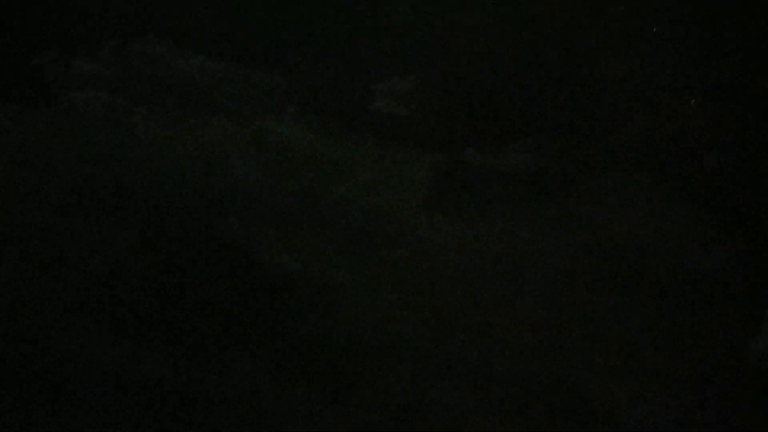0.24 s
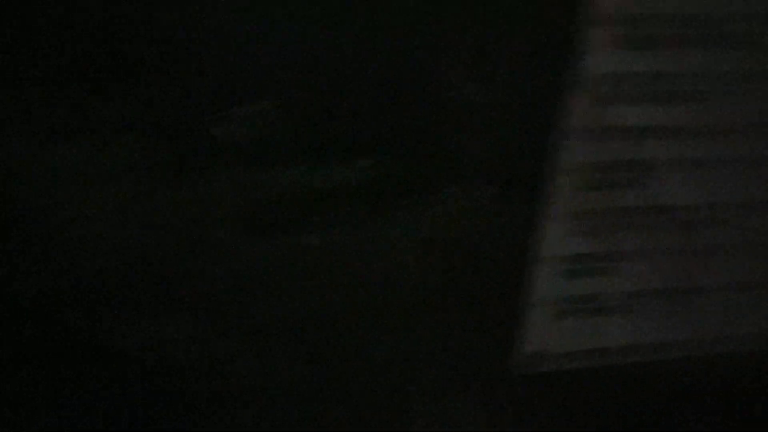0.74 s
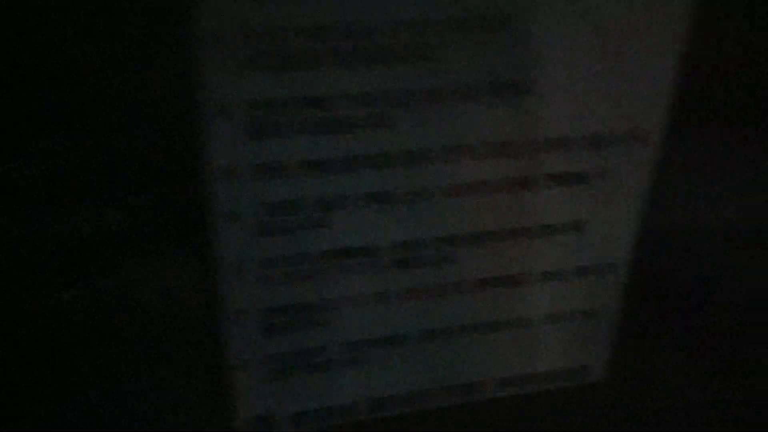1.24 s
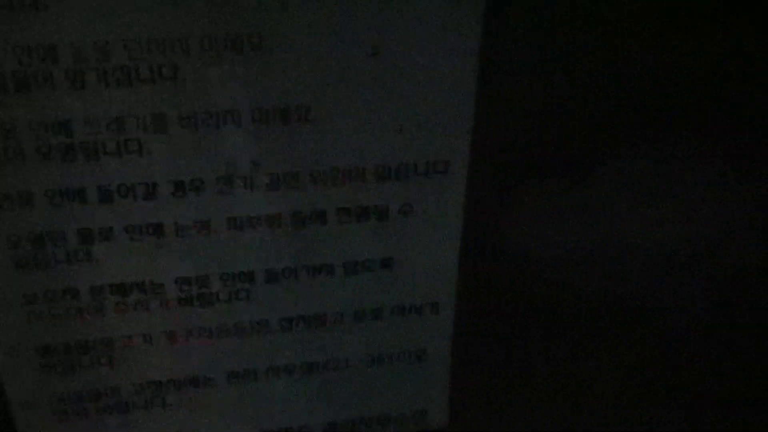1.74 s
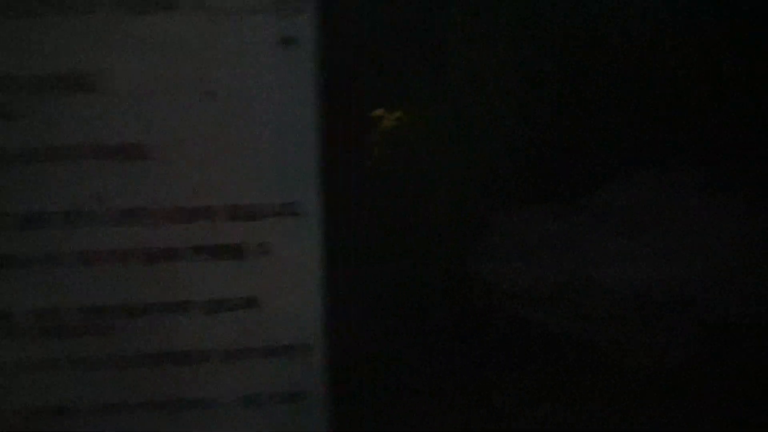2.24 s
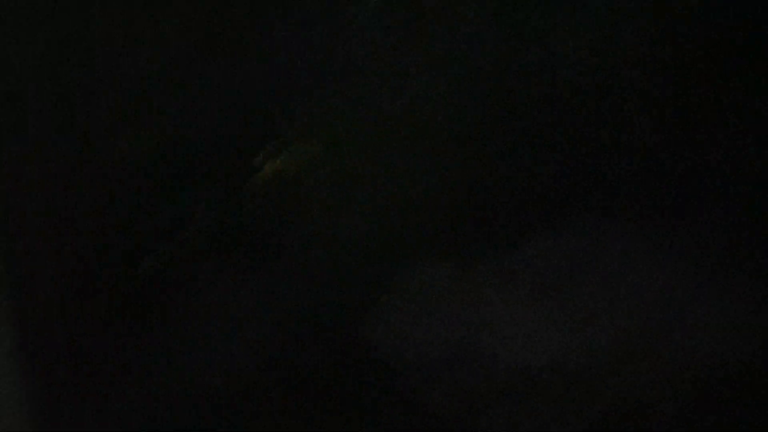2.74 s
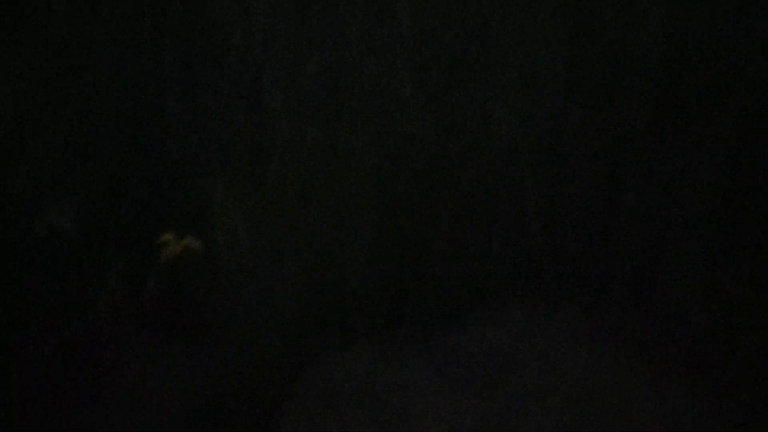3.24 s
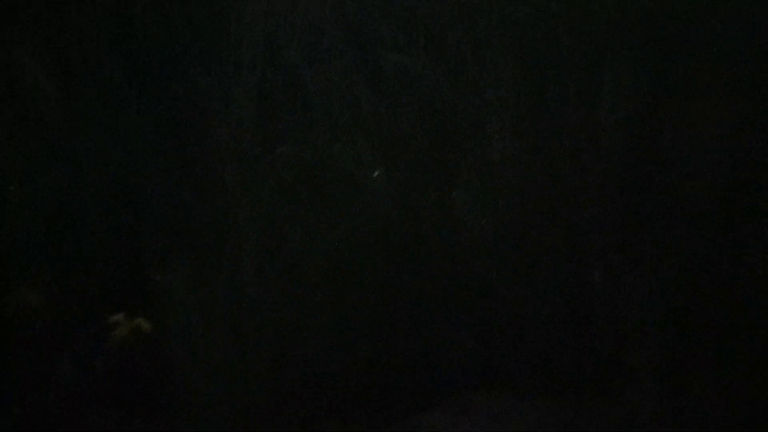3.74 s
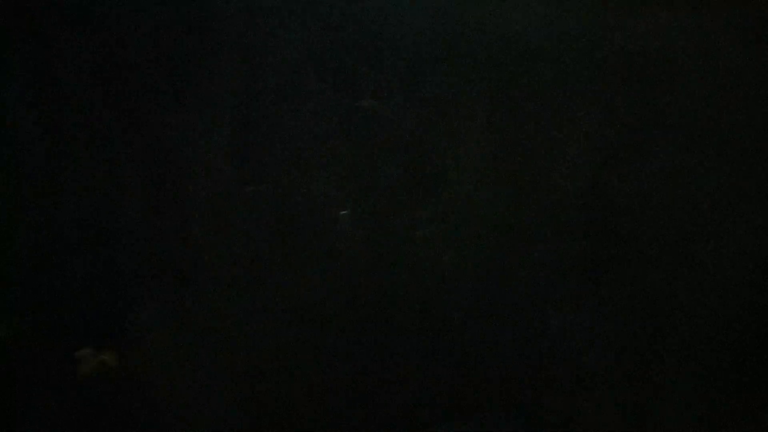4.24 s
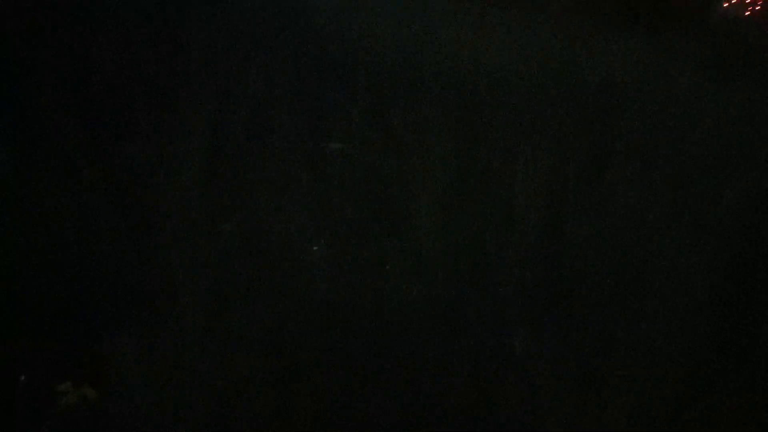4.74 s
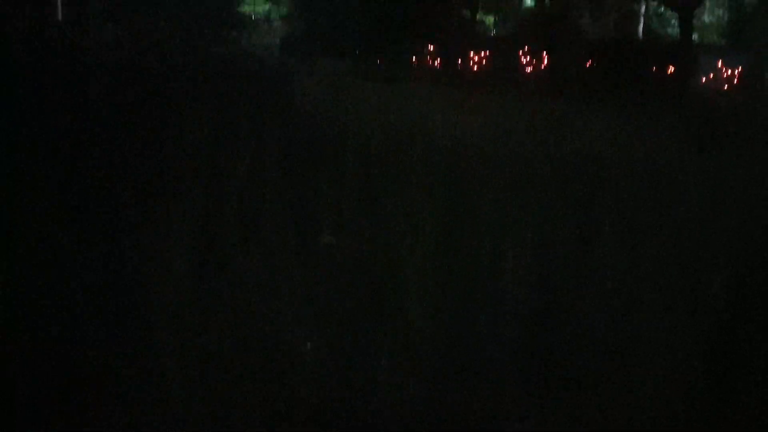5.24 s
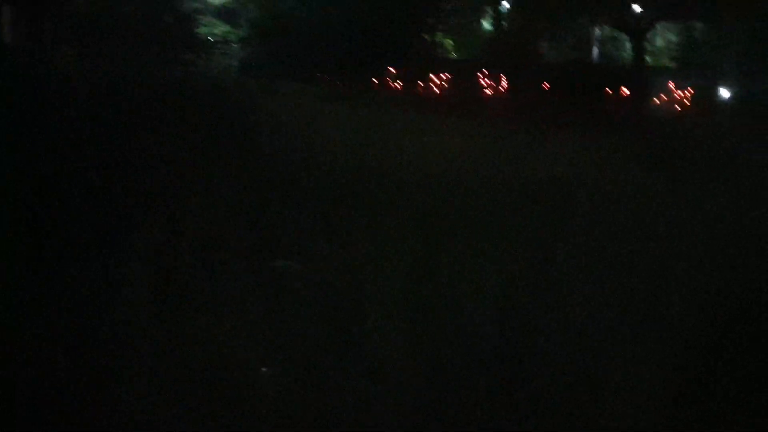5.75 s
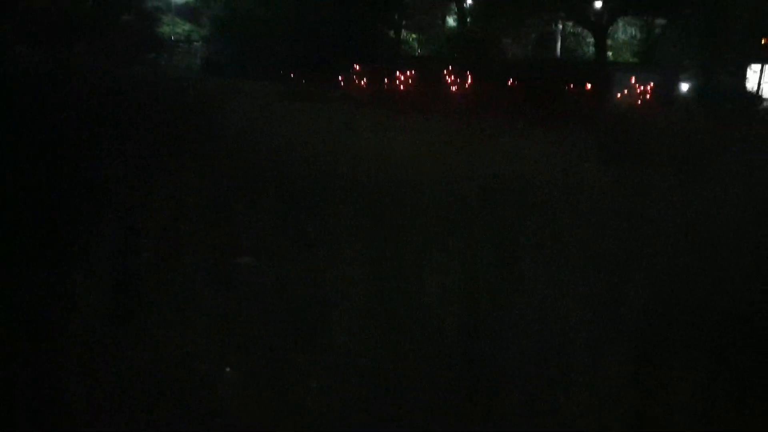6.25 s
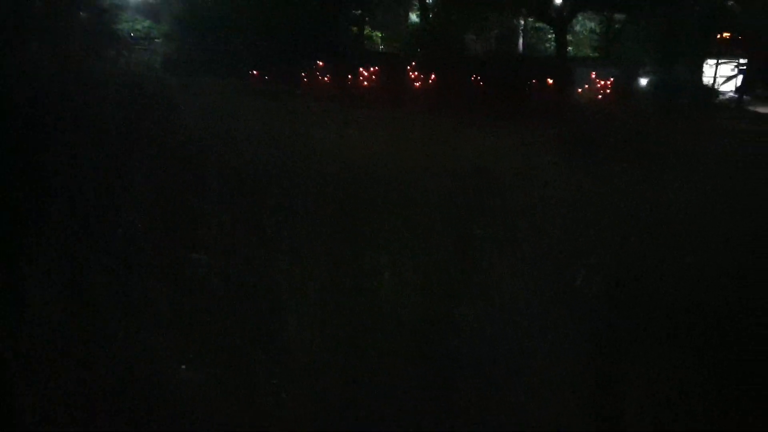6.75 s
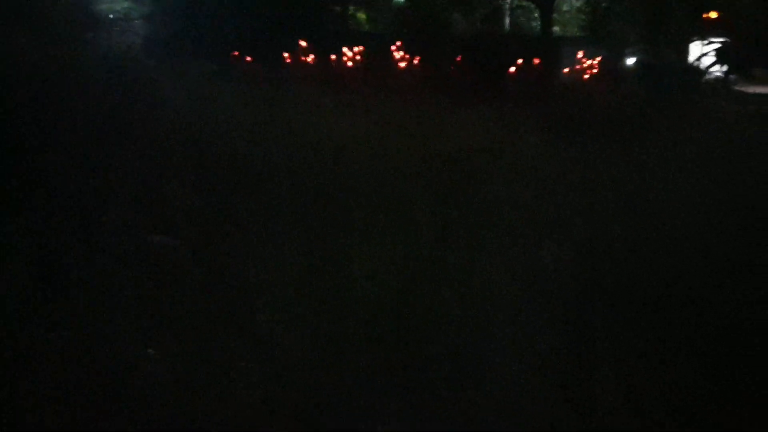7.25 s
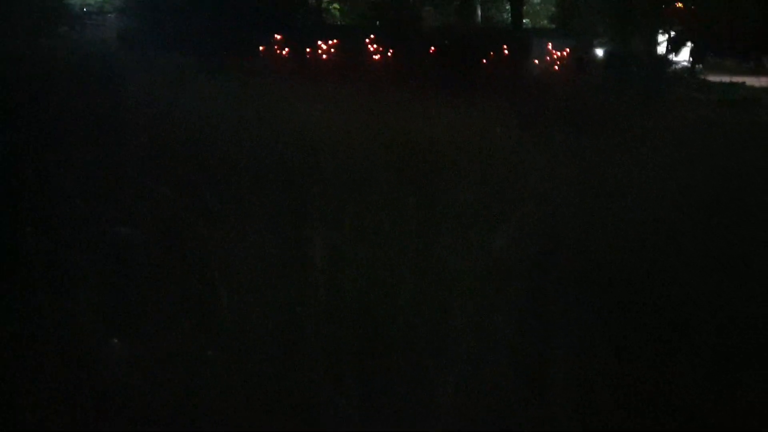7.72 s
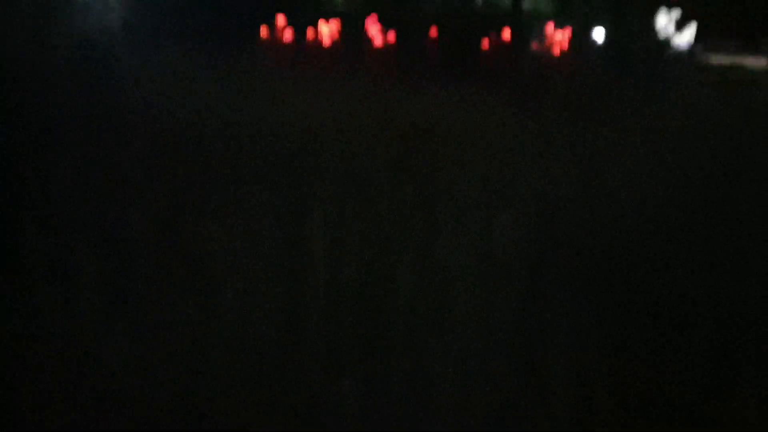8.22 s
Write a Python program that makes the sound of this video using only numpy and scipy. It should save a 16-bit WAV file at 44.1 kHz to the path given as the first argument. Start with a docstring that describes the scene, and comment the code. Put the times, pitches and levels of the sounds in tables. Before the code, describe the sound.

Tree frogs croak in rapid alternation in a dark night marsh, two close voices trading calls over a distant chorus, low rumble and handling ticks.

```python
"""A near male tree frog and his rival take turns in a night marsh, each calling about three times a second.
Each croak is a quickening train of pulses ringing in the vocal sac and throat.
Other frogs cut in or rattle with pulses of their own, and more call far off.
Short low notes fall in pitch: first a finger squeak beside a tick, later a bigger frog's clucks.
Filtered noise makes a low rumble, a breeze and a wash of far frogs; handling ticks, scuffs and bumps."""
import sys
import numpy as np
from scipy import signal
from scipy.fft import rfft, irfft, next_fast_len
from scipy.io import wavfile
from scipy.ndimage import map_coordinates

SR = 44100
rng = np.random.default_rng(int(sys.argv[2]) if len(sys.argv) > 2 else 0)


def int16_out(signal):
    """Quantize to a 16-bit WAV file."""
    q = np.round(np.clip(np.atleast_2d(signal).T, -1, 1) * 32767)
    wavfile.write(sys.argv[1], SR, q.astype(np.int16))


N = 373968


def from_db(db):
    """Turn decibels into a gain."""
    return 10 ** (np.asarray(db) / 20)


def rms_one(x):
    """Scale a sound to an rms of 1."""
    return x / np.sqrt(np.mean(x ** 2) + 1e-20)


def colour(x, spectrum):
    """Shape a sound by a smooth curve of (pitch_hz, level_db), then scale it to an rms of 1."""
    pitch_hz, level_db = np.transpose(spectrum)
    size = next_fast_len(x.shape[-1])
    bins_hz = np.maximum(np.fft.rfftfreq(size, 1 / SR), 1)
    gain = from_db(np.interp(np.log(bins_hz), np.log(pitch_hz), level_db))
    shaped = irfft(rfft(x, size) * gain, size)
    return rms_one(shaped[..., :x.shape[-1]])


def stereo_noise(count, side_db):
    """White noise shared by both ears, plus a part with opposite sign at each ear."""
    mid, side = rng.standard_normal((2, count))
    return mid + from_db(side_db) * side * [[1], [-1]]


def add(out, start_s, sound):
    """Mix a sound in at its start time, dropping what falls outside the scene."""
    at = round(start_s * SR)
    first, last = max(at, 0), min(at + sound.shape[-1], N)
    if last > first:
        out[:, first:last] += sound[..., first - at:last - at]


def at_time(rows, t):
    """Read every column of a curve at time t, along straight lines."""
    time, *columns = np.transpose(rows)
    return [np.interp(t, time, column) for column in columns]


def drift(count):
    """Slow chance: random values spread over the scene, joined by straight lines."""
    return np.interp(np.linspace(0, count - 1, N), np.arange(count), rng.standard_normal(count))


def place(x, pan_db, lead_ms):
    """Give a sound its direction: positive settings make the left ear louder and earlier."""
    n = np.arange(len(x))
    left = map_coordinates(x, [n + lead_ms * SR / 1000], order=3)
    return np.array([left * from_db(pan_db / 2), x * from_db(-pan_db / 2)])


def bank_echo(x, t60_s, wet_db):
    """Reeds and trees scatter a thin tail of fading noise, different at each ear."""
    t = np.arange(SR // 2) / SR
    fade = from_db(-60 * t / t60_s) * (t > .003)
    tail = rng.standard_normal((2, len(t))) * fade
    tail /= np.sqrt(np.sum(tail ** 2, axis=1, keepdims=True))
    return x + from_db(wet_db) * signal.fftconvolve(x, tail, axes=1)[:, :N]


# colour of the distant rumble: (pitch_hz, level_db)
RUMBLE_COLOUR = [(15, -41), (25, -4.5), (43, 2), (64, 8), (128, -2), (275, -12.5), (372, -14), (452, -17),
                 (517, -17), (565, -15.5), (798, -22), (900, -47.5), (1170, -57.5), (1980, -120)]
# course of the rumble before it is raised below: (time_s, level_db)
RUMBLE_COURSE = [(0.0, -51.5), (3.33, -49.5), (5.74, -50.5), (7.91, -49.5), (8.12, -44), (8.48, -49)]


def town_rumble():
    """Low noise from the town, nearly alike at both ears, rises and falls along a curve."""
    raise_db, sway_db = 2, 0.14
    course_db, = at_time(RUMBLE_COURSE, np.arange(N) / SR)
    level_db = course_db + raise_db + sway_db * drift(count=40)
    return from_db(level_db) * colour(stereo_noise(N, side_db=-16), RUMBLE_COLOUR)


def breeze():
    """A light breeze is low noise that differs at each ear, with slight gusts."""
    level_db, gust_db = -55.5, 0.5
    spectrum = [(20, -43), (45, -1.5), (62, 4.5), (110, -10.5), (300, -50)]
    gusts = from_db(level_db + gust_db * drift(count=30))
    return gusts * colour(rng.standard_normal((2, N)), spectrum)


# colour of the even wash: (pitch_hz, level_db)
WASH_COLOUR = [(600, -4), (1100, 0), (1800, -3), (2600, 3), (3500, -4.5), (5200, -10), (7000, -7),
               (8500, -19.5), (11000, -29.5), (15500, -34)]


def distant_wash():
    """The farthest frogs and leaves blend into a steady hiss."""
    return from_db(-50.5) * colour(stereo_noise(N, side_db=1.0), WASH_COLOUR)


def night_air():
    """Rumble, breeze and wash together, thinned below 36 Hz and a little stronger on the right."""
    low_cut = signal.butter(4, 36, "high", fs=SR, output="sos")
    air = town_rumble() + breeze() + distant_wash()
    return signal.sosfilt(low_cut, air) * from_db([[-1.2], [1.1]])


# soft bumps: (start_s, peak_of_outline_db, pitch_hz)
BUMPS = [(2.802, -36.5, 59.6), (3.035, -39, 150), (3.062, -33.5, 109), (3.068, -42, 234), (3.913, -33, 174),
         (5.17, -37, 139), (5.997, -37, 131), (6.729, -33.5, 98), (7.878, -31, 106), (8.162, -32.5, 107),
         (8.229, -32.5, 91)]


def bumps():
    """Each bump is a low tone that swells for 9 ms and dies away."""
    out, t = np.zeros((2, N)), np.arange(SR // 2) / SR
    x = t / .009
    outline = x * np.exp(1 - x)
    for start_s, level_db, pitch_hz in BUMPS:
        add(out, start_s, from_db(level_db) * outline * np.sin(2 * np.pi * pitch_hz * t))
    return out


# ticks and scuffs of the fingers: (start_s, level_db, decay_s, knock_relative_db)
CLICKS = [(.775, -44, .019, -3), (1.477, -34.5, 0.0058, -2), (1.598, -37.5, 0.0091, -12),
          (1.603, -29, 0.0054, -5), (1.613, -30.5, 0.0047, -15), (1.83, -56, 0.079, -20),
          (1.88, -54.5, 0.14, -20), (3.057, -38.5, 0.0071, -9), (3.068, -36, 0.026, -9),
          (4.18, -60, 0.22, -18)]
# colour of their grit: (pitch_hz, level_db)
CLICK_COLOUR = [(200, -15), (500, 0), (950, -0.5), (1600, 1), (4000, -4.5), (7500, 1.5), (10000, -7.5),
                (15000, -11)]
# ringing of the knocked case: (pitch_hz, level_db, decay_s)
CASE_MODES = [(446, -12, 0.013), (550, 0, 0.0093), (870, -3.5, 0.0053)]


def finger_clicks():
    """Fingers tick and scuff on a case: fading noise sounds together with the ringing case."""
    out, t = np.zeros((2, N)), np.arange(SR // 2) / SR
    knock = sum(from_db(level_db) * np.exp(-t / decay_s) * np.sin(2 * np.pi * pitch_hz * t)
                for pitch_hz, level_db, decay_s in CASE_MODES)
    for start_s, level_db, decay_s, knock_db in CLICKS:
        grit = colour(stereo_noise(len(t), side_db=0.0), CLICK_COLOUR)
        # a faint, longer scrape follows the first fade
        fade = np.exp(-t / decay_s) + from_db(-27) * np.exp(-t / 0.085)
        add(out, start_s, from_db(level_db) * (grit * fade + from_db(knock_db) * knock))
    return out


# short low notes, first the finger squeak, then the clucks:
# (start_s, length_s, level_db, start_pitch_hz, end_pitch_hz, edge_relative_db)
FALLING_NOTES = [(0.764, 0.044, -32, 537, 393, 0), (7.008, .04, -55, 477, 400, 12),
                 (7.08, 0.049, -47.5, 482, 385, 7), (7.162, 0.052, -46, 498, 375, 7.5),
                 (7.235, 0.078, -45.5, 503, 400, 5)]


def squeak_and_clucks():
    """Short low falling notes with a hoarse edge: a finger squeak, later a bigger frog's clucks."""
    out = np.zeros((2, N))
    edge_colour = [(230, -28), (380, 1.5), (820, -3.0), (1500, -12), (3000, -58)]
    for start_s, length_s, level_db, from_hz, to_hz, edge_db in FALLING_NOTES:
        progress = np.linspace(0, 1, int(length_s * SR))
        phase = 2 * np.pi * np.cumsum(from_hz + (to_hz - from_hz) * progress) / SR
        hoarse = colour(rng.standard_normal(len(progress)), edge_colour)
        edge = 0.59 * hoarse + 0.17 * np.sin(2 * phase)
        note = np.sin(phase) + from_db(edge_db) * edge
        outline = np.sqrt(np.abs(np.sin(np.pi * progress))) * from_db(-4 * progress)
        add(out, start_s, from_db(level_db) * outline * note)
    return out


def pulse_times(length_s, first_rate, quickening, jitter_ms):
    """Snaps of the larynx: pulses per second grow by `quickening` each second."""
    k = np.arange(60)
    times = (np.sqrt(first_rate ** 2 + 2 * quickening * k) - first_rate) / quickening
    times = np.abs(times + rng.standard_normal(len(k)) * jitter_ms / 1000)
    return times[times < length_s]


def bursts(times, length_s, sizes, pitch_hz, ring_ms):
    """Each pulse swells and dies as a short tone (pitch 0 gives only its outline); rms 1."""
    age = np.arange(400) / SR
    x = age * 1000 / ring_ms
    outline = x ** 2 * np.exp(-x)
    # every tone crests at the peak of its outline, two ring times in
    since_peak = age - 2 * ring_ms / 1000
    tone = np.cos(2 * np.pi * np.outer(pitch_hz * np.ones(len(times)), since_peak))
    pulses = sizes[:, None] * outline * tone
    where = (times * SR).astype(int)[:, None] + np.arange(len(age))
    return rms_one(np.bincount(where.ravel(), pulses.ravel(), int(length_s * SR) + len(age) + 1))


# colour of the breathy rasp: (pitch_hz, level_db)
RASP_COLOUR = [(780, -63.5), (1020, 18.5), (1500, 0.5), (2100, 8.5), (2700, 6.5), (3400, -0.5),
               (4400, -11.5), (5600, -14), (7100, -7), (8300, -25.5), (9400, -25.5), (11000, -73)]


def rasp(gate):
    """A puff of air passes with every pulse: noise shaped by the pulses' outline."""
    return colour(gate * rng.standard_normal(len(gate)), RASP_COLOUR)


def croak(length_s, sac_db, throat_db, tones, swell, sac_hz, sac_rise, sac_ring_ms,
          roughness, rasp_db, start_pulses_per_s):
    """One call: pulses ring the sac and the throat's tones, all rising as the sac tightens."""
    pitch_scatter = 0.02   # from call to call, as a share, at full roughness
    times = pulse_times(length_s, rng.normal(start_pulses_per_s, 2), quickening=420,
                        jitter_ms=.22 * roughness)
    progress = times / length_s
    sac_size, low_size = at_time(swell, progress)
    # pitch climbs for three quarters of the call, passing its table value at 60 %, then holds
    tension = np.minimum(progress, .75) - .6
    pitch_hz = sac_hz * (1 + pitch_scatter * roughness * rng.standard_normal())

    def ring(size, hz, ring_ms):
        """A hoarse frog's pulses differ in strength and pitch."""
        strength, detune = roughness * rng.standard_normal((2, len(times)))
        return bursts(times, length_s, size * from_db(3.5 * strength), hz * (1 + .02 * detune), ring_ms)

    call = from_db(sac_db) * ring(sac_size, pitch_hz * (1 + sac_rise * tension), sac_ring_ms)
    for k, (tone_hz, ring_ms, rise, tone_db) in enumerate(tones):
        size = low_size if k == 0 else sac_size
        call += from_db(throat_db + tone_db) * ring(size, tone_hz * (1 + rise * tension), ring_ms)
    gate = ring(low_size, 0, .55)
    return call + from_db(throat_db + rasp_db) * rasp(gate)


# shape of a hoarse croak, used by all but the near male: (share_of_length, sac_size, low_tone_size)
HOARSE_SWELL = [(0, 0.066, .25), (.22, 0.48, .68), (.43, 0.95, 1), (.75, 0.93, 0.82), (.9, .45, .7),
                (1, 0.27, 0.21)]


def far_frogs(count=6):
    """Each far frog keeps its own tempo, pitch and direction; little but the sac tone carries."""
    out = np.zeros((2, N))
    # one throat tone: (pitch_hz, ring_ms, rise_share, relative_db)
    voice = dict(tones=[(1230, .55, 0.16, 0.013)], swell=HOARSE_SWELL, sac_rise=0.13, sac_ring_ms=.95,
                 roughness=.2, rasp_db=2, start_pulses_per_s=138)
    # ranges of period in s, sac pitch in Hz, pan in dB and left ear lead in ms
    lowest, highest = [.28, 2480, -4, -.3], [.36, 2740, 2, .5]
    for period_s, pitch_hz, pan_db, lead_ms in rng.uniform(lowest, highest, (count, 4)):
        for start_s in np.arange(-rng.random() * period_s, N / SR, period_s):
            call = croak(.13, sac_db=-45.5, throat_db=-63, sac_hz=pitch_hz, **voice)
            add(out, start_s + rng.normal(0, .015), place(call, pan_db, lead_ms))
    return out


# rattling calls: (start_s, length_s, level_db, start_pulses_per_s,
#                  whistle_start_hz, whistle_end_hz, whistle_relative_db)
RATTLES = [(0.675, 0.062, -56.5, 120, 4150, 4700, 1), (1.219, 0.097, -44.5, 120, 4700, 5300, -10),
           (1.466, 0.12, -40.5, 100, 4000, 4300, -32), (5.465, 0.23, -38, 115, 4080, 5000, -14.5),
           (5.652, .182, -34.5, 113, 6630, 7100, -14.5), (6.136, 0.12, -34.5, 91, 5400, 6500, -19),
           (6.261, 0.24, -34, 88, 6560, 6660, -20)]
# what each pulse of a rattle rings: (pitch_hz, ring_ms, relative_db)
RATTLE_TONES = [(1086, 0.672, -4), (1700, .45, -5.5), (2437, 0.682, 5)]


def rattles():
    """Hard pulses, quickening only a little, ring fixed tones under a climbing whistle."""
    out = np.zeros((2, N))
    for start_s, length_s, level_db, pulses_per_s, from_hz, to_hz, whistle_db in RATTLES:
        times = pulse_times(length_s, pulses_per_s, quickening=25, jitter_ms=.15)
        sizes = from_db(rng.normal(0, 1.6, len(times)))
        call = sum(from_db(tone_db) * bursts(times, length_s, sizes, tone_hz, ring_ms)
                   for tone_hz, ring_ms, tone_db in RATTLE_TONES)
        whistle_hz = np.interp(times, [0, length_s], [from_hz, to_hz])
        call += from_db(whistle_db) * bursts(times, length_s, sizes, whistle_hz, .36)
        gate = bursts(times, length_s, sizes, 0, .55)
        call += from_db(-8.5) * rasp(gate)
        add(out, start_s, from_db(level_db) * place(call, pan_db=-3, lead_ms=.26))
    return out


def frog(bouts, heard, voice):
    """One frog repeats its croak evenly through each bout, while its level and direction shift."""
    out = np.zeros((2, N))
    for first_s, last_s, count, length_s in bouts:
        for start_s in np.linspace(first_s, last_s, round(count)):
            sac_db, throat_db, pan_db, lead_ms = at_time(heard, start_s + length_s / 2)
            add(out, start_s, place(croak(length_s, sac_db, throat_db, **voice), pan_db, lead_ms))
    return out


# bouts of even calling: (first_call_s, last_call_s, number_of_calls, call_length_s)
REEDY_BOUTS = [(.03, .03, 1, .09), (5.798, 6.085, 2, .09), (6.612, 8.138, 6, .09), (8.4, 8.4, 1, .09)]
# level and direction: (time_s, sac_db, throat_db, left_over_right_db, left_lead_ms)
REEDY_HEARD = [(.07, -43.5, -53, 0, .35), (6.1, -43.5, -54.5, -1, 0.3), (6.65, -32.5, -54, -1, .45),
               (7.001, -38, -52.5, -1, 0.54), (7.9, -37, -51, -1, .48), (8.2, -38.5, -48, -1, 0.45),
               (8.45, -35.5, -49, -1, 0.32)]
# throat tones, low tone first: (pitch_hz, ring_ms, rise_share, relative_db)
REEDY_TONES = [(1350, 0.34, .1, 5), (3905, 0.635, .02, -4), (6400, .35, .05, -15.5), (1900, .4, .093, -3)]


def reedy_frog():
    """A reedy voice with fast pulses and strong throat tones cuts in."""
    voice = dict(tones=REEDY_TONES, swell=HOARSE_SWELL, sac_hz=2390, sac_rise=.08, sac_ring_ms=0.896,
                 roughness=.25, rasp_db=-4, start_pulses_per_s=161.6)
    return frog(REEDY_BOUTS, REEDY_HEARD, voice)


# bouts of even calling: (first_call_s, last_call_s, number_of_calls, call_length_s)
THIRD_BOUTS = [(1.42, 3.605, 8, .098)]
# level and direction: (time_s, sac_db, throat_db, left_over_right_db, left_lead_ms)
THIRD_HEARD = [(1.45, -38, -44, -1, 0.48), (3.65, -37, -46, -1.5, 0.4)]
# throat tones, low tone first: (pitch_hz, ring_ms, rise_share, relative_db)
THIRD_TONES = [(1390, 0.27, .1, -4), (3980, .5, .02, -15), (6500, .35, .05, -19), (1910, 0.43, .093, -4.5)]


def third_frog():
    """The roughest voice: its pulses vary most in strength and pitch, with much rasp."""
    voice = dict(tones=THIRD_TONES, swell=HOARSE_SWELL, sac_hz=2408, sac_rise=0.073, sac_ring_ms=.85,
                 roughness=0.55, rasp_db=5, start_pulses_per_s=150.8)
    return frog(THIRD_BOUTS, THIRD_HEARD, voice)


# bouts of even calling: (first_call_s, last_call_s, number_of_calls, call_length_s)
SHRILL_BOUTS = [(.17, .505, 2, .078)]
# level and direction: (time_s, sac_db, throat_db, left_over_right_db, left_lead_ms)
SHRILL_HEARD = [(.2, -29, -40.5, -1, 0.36), (.55, -33, -41, -1.1, 0.36)]


def shrill_frog():
    """A short, hoarse call with a high sac pitch and the near male's throat tones."""
    voice = dict(tones=NEAR_TONES, swell=HOARSE_SWELL, sac_hz=2780, sac_rise=0.2, sac_ring_ms=0.703,
                 roughness=.4, rasp_db=0.5, start_pulses_per_s=139.3)
    return frog(SHRILL_BOUTS, SHRILL_HEARD, voice)


# bouts of even calling: (first_call_s, last_call_s, number_of_calls, call_length_s)
RIVAL_BOUTS = [(.37, .672, 2, .165), (1.042, 3.303, 8, .119), (3.62, 6.118, 9, .115),
               (6.441, 8.338, 7, .119)]
# level and direction: (time_s, sac_db, throat_db, left_over_right_db, left_lead_ms)
RIVAL_HEARD = [(.45, -36, -44, 0, .36), (.75, -32.5, -38, 1.5, .41), (1.42, -31.5, -35.5, -3.5, .42),
               (1.75, -32, -41, 0, 0.41), (2.7, -35, -40, 5.5, 0.49), (3.05, -36, -39, -3.5, 0.45),
               (3.7, -30.5, -37.5, -.5, .42), (4.9, -32, -36.5, -1, 0.45), (6.15, -36.5, -39, 0.5, 0.46),
               (6.5, -34, -41, -.5, 0.47), (8.4, -33, -37, 0.5, 0.46)]
# throat tones, low tone first: (pitch_hz, ring_ms, rise_share, relative_db)
RIVAL_TONES = [(1357, .37, 0.14, -1.5), (3900, .4, 0.13, -22), (7090, .3, 0.5, -30.5),
               (2130, 0.528, 0.36, -6), (9700, 0.29, .05, -44)]


def rival():
    """The rival calls in the near male's gaps, with rougher pulses."""
    voice = dict(tones=RIVAL_TONES, swell=HOARSE_SWELL, sac_hz=2576, sac_rise=0.2, sac_ring_ms=0.853,
                 roughness=.33, rasp_db=-4.5, start_pulses_per_s=138.8)
    return frog(RIVAL_BOUTS, RIVAL_HEARD, voice)


# bouts of even calling: (first_call_s, last_call_s, number_of_calls, call_length_s)
NEAR_BOUTS = [(.158, .488, 2, .138), (.886, .886, 1, .12), (1.212, 2.83, 6, .134), (3.15, 4.106, 4, .133),
              (4.422, 5.665, 5, .123), (5.984, 6.622, 3, .124), (6.931, 8.192, 5, .135)]
# level and direction: (time_s, sac_db, throat_db, left_over_right_db, left_lead_ms)
NEAR_HEARD = [(.2, -30, -41, -1.5, 0.25), (1.25, -29, -39, 1, 0.33), (1.6, -33.5, -46, 1.5, 0.42),
              (1.9, -36.5, -46, 4.5, 0.43), (2.57, -33.5, -44.5, -1, 0.17), (2.9, -31, -42, -5.5, .25),
              (3.5, -26.5, -41, -3.5, .27), (4.17, -28.5, -40.5, -2, 0.32), (4.5, -29.5, -40.5, -2, 0.35),
              (5.7, -27, -38.5, -2, 0.32), (6.4, -29.5, -38, -2.5, 0.38), (8.3, -28, -39.5, -1, .39)]
# throat tones, low tone first: (pitch_hz, ring_ms, rise_share, relative_db)
NEAR_TONES = [(1350, 0.46, .31, -0.5), (4067, .35, 0.15, -13.5), (6900, .5, 0.053, -17.5),
              (1926, .7, 0.17, -17), (9400, 0.84, .03, -45)]
# shape of a clean croak: (share_of_length, sac_size, low_tone_size)
CLEAN_SWELL = [(0, .05, .45), (.22, .2, .62), (.38, .88, .8), (.6, 1, .85), (.84, .92, .96), (.94, .4, .55),
               (1, .1, .3)]


def near_male():
    """The near male's pulses are clean and even, ringing his sac and throat with little roughness."""
    voice = dict(tones=NEAR_TONES, swell=CLEAN_SWELL, sac_hz=2611, sac_rise=.18, sac_ring_ms=0.73,
                 roughness=0.14, rasp_db=-4, start_pulses_per_s=135.4)
    return frog(NEAR_BOUTS, NEAR_HEARD, voice)


def scene():
    """Close and far frogs in the marsh, over the night air and the sounds of handling."""
    callers = near_male() + rival() + third_frog() + reedy_frog() + shrill_frog()
    close = bank_echo(callers + rattles(), t60_s=.11, wet_db=-7)
    frogs = close + bank_echo(far_frogs(), t60_s=.25, wet_db=0)
    # such small bodies radiate next to nothing below their lowest tone
    frogs = signal.sosfiltfilt(signal.butter(9, 890, "high", fs=SR, output="sos"), frogs)
    return night_air() + bumps() + finger_clicks() + squeak_and_clucks() + frogs


def record(dry):
    """Cut the treble steeply above 15.7 kHz."""
    return signal.sosfilt(signal.ellip(10, .1, 80, 15700, fs=SR, output="sos"), dry)


dry = scene()
out = record(dry)
int16_out(out)
```